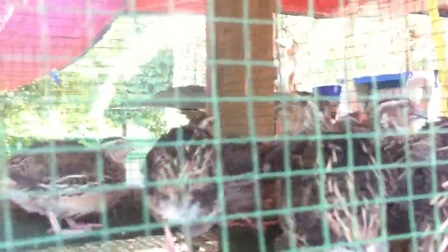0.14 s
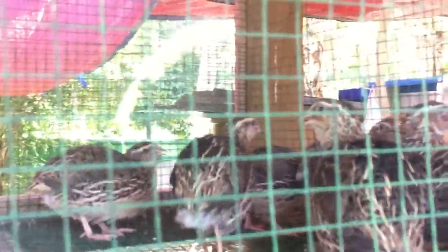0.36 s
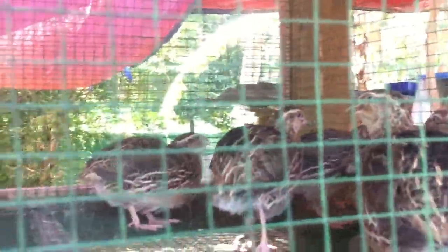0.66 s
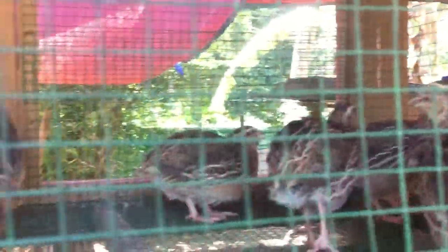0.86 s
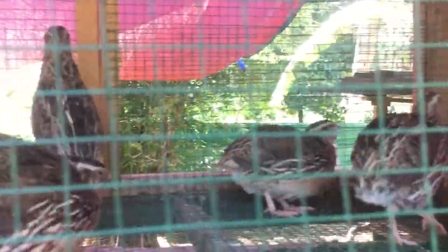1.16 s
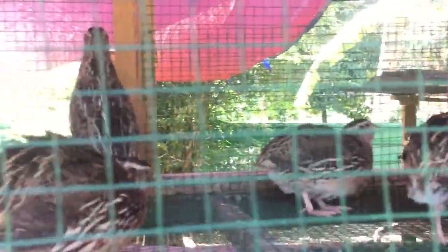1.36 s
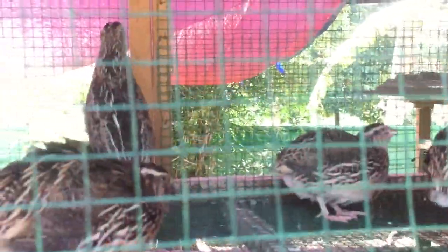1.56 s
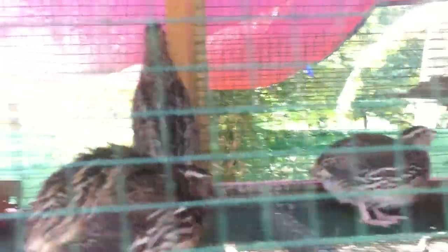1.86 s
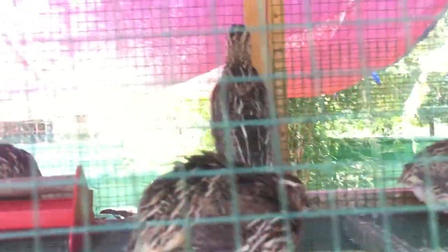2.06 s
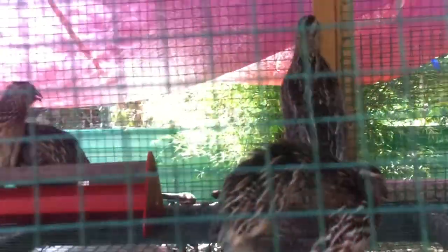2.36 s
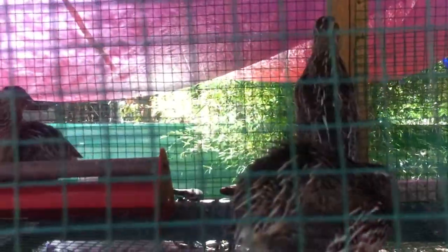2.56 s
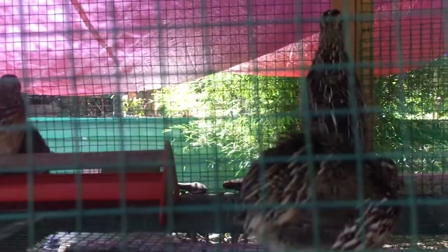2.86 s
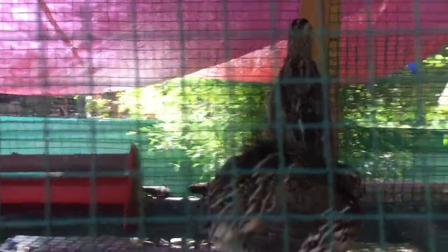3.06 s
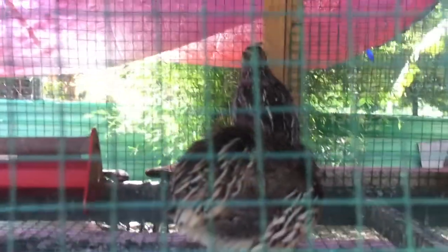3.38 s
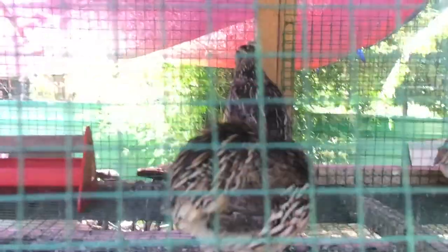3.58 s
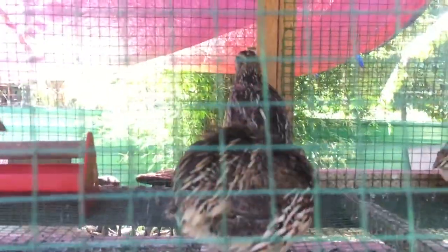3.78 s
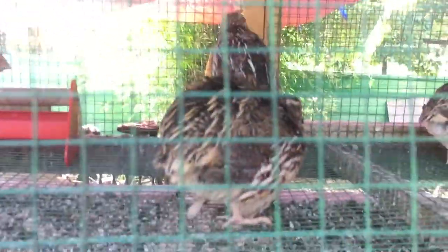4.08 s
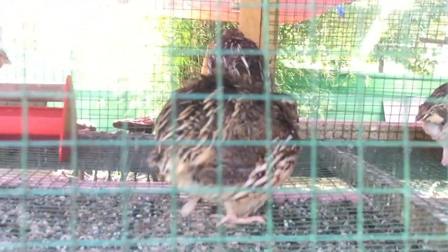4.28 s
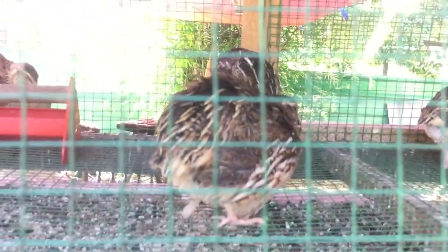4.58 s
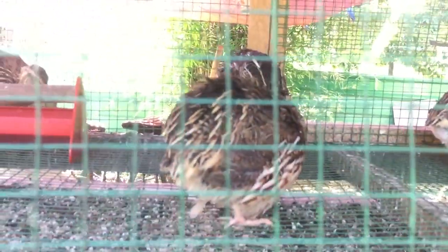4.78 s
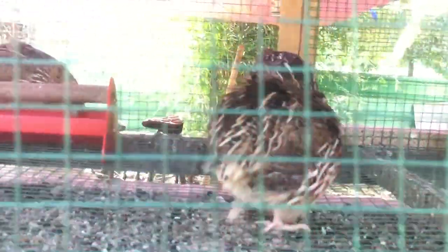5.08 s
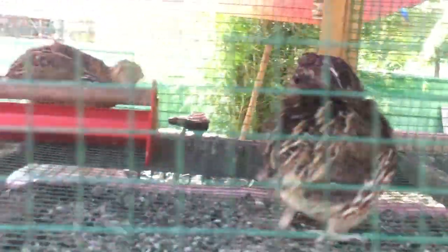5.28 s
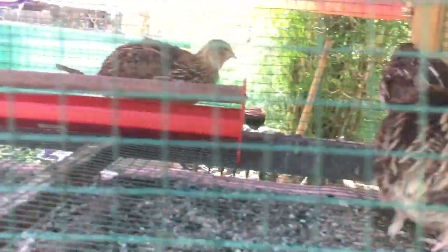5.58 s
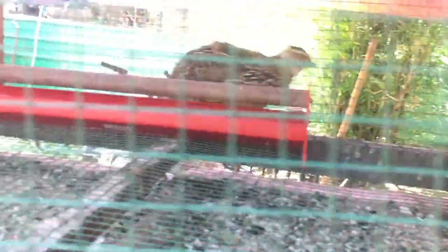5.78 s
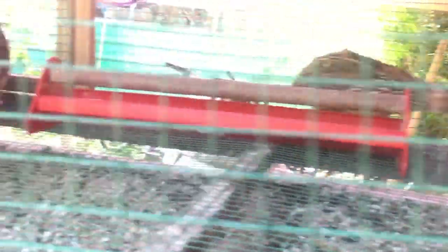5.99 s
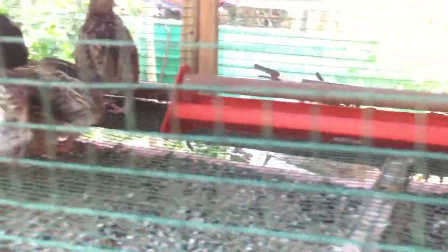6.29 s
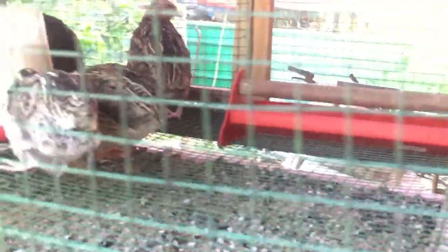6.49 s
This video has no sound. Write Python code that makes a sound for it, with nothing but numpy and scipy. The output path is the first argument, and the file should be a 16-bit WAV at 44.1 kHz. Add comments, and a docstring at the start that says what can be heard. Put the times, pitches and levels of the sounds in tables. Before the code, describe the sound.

Very loud, close quail crowing: rough whistles swooping rapidly up and down inside a pulsed rasp. One trill opens, two barks lead to a second, longer one, and a third, loudest, breaks into a screech before three seconds. Short pen echoes follow. The rest is soft flock peeps, dull knocks, scratchy ticks and two wavering spells of far fowl calling, over quiet outdoor air and hum.

```python
"""Quail crow in an outdoor wire pen: a harsh trill, two short barks and a longer trill, then a crow
very close to the microphone that ends in a screech. Each crow is a rough whistle that swoops inside a
pulsed noise rasp. Among them the flock chirps (gliding tones), pecks and shuffles (decaying noise bursts).
Far off, fowl give long sagging calls built from partials; yard air and a low wavering hum lie underneath.
The pen adds echoes, and an automatic gain turns down after loud calls."""
import sys
import numpy as np
from scipy import signal
from scipy.fft import rfft, irfft, next_fast_len
from scipy.io import wavfile

SR = 44100
rng = np.random.default_rng(int(sys.argv[2]) if len(sys.argv) > 2 else 0)


def inscribe(sig):
    """Save sig as 16-bit PCM at rate SR to the path in sys.argv[1].

    A 1-D sig is mono; a 2-D sig holds one channel per row.
    Samples are clipped to [-1, 1] before scaling.
    """
    pcm = np.round(np.clip(np.atleast_2d(sig).T, -1, 1) * 32767)
    wavfile.write(sys.argv[1], SR, pcm.astype(np.int16))


N = 292824
TIME = np.arange(N) / SR

# Three crows: (start [s], end [s], attack [s], release [dB/s], fall into a trough [s],
# closing pitch [Hz], change of level by the end [dB], roughness in the troughs [0-1])
CROWS = [(.080, 0.419, 0.039, 650, .030, 2247, -2.5, 0.38),
         (1.795, 2.208, 0.035, 1601, 0.025, 2354, -3.5, 0.44),
         (2.353, 2.653, 0.021, 1099, .017, 2905, -8, .2)]
# The run of swoops in each crow, about eighteen a second; one list per crow:
# (trough time [s], trough pitch [Hz], crest pitch [Hz], trough level [dB], crest level [dB])
SWOOPS = [
    [(.107, 1600, 3100, -14.5, -20), (.157, 1420, 3800, -16, -24.5), (.211, 1550, 3806, -15, -29),
     (.268, 1600, 3890, -15, -26), (.335, 1700, 3500, -14, -18)],
    [(1.823, 1520, 3000, -14, -15.5), (1.876, 1450, 3800, -16, -25), (1.928, 1550, 3900, -16.5, -20.5),
     (1.986, 1600, 3900, -16.5, -21), (2.042, 1450, 2996, -11, -13), (2.110, 1750, 3157, -16, -13.5),
     (2.188, 1550, 2424, -13.5, -12)],
    [(2.374, 1560, 3386, -11.5, -21), (2.417, 1700, 3800, -7, -12), (2.464, 1800, 3202, -10, -10),
     (2.514, 2400, 3100, -7.5, -7)],
]
# From its trough the pitch climbs slowly, leaps to the crest, sags there and falls into the next trough
CLIMB_S, CLIMB_RATIO, CREST_S, CREST_SAG_HZ_PER_S = 0.0125, 1.25, 0.020, 10000
# Over this range of pitch the whistle breaks into rasp
BREAK_HZ, BREAK_WIDTH_HZ, CREST_ROUGH = 1990, 1000, 0.9
# The voice is lifted as it passes through the resonance of the throat
THROAT_HZ, THROAT_WIDTH_HZ, THROAT_DB = 2160, 200, 4
# Short rising barks before the second crow:
# (start [s], length [s], start pitch [Hz], end pitch [Hz], level [dB], roughness [0-1])
BARKS = [(1.41, .047, 1169, 1333, -25, .72), (1.619, .036, 1256, 1670, -17.5, 0.5)]
BARK_ATTACK_S, BARK_RELEASE_DB_PER_S = 0.026, 647
# Colour of the rasp in troughs, crests, barks and final screech: (frequency [Hz], relative density [dB/Hz])
TROUGH_RASP = [(200, -45.5), (450, -26.5), (700, -14.5), (900, -5.5), (1500, 10), (2300, -1), (3200, -7.5),
               (4300, -20), (5200, -25.5), (7000, -17), (7800, -32), (10000, -34), (13500, -35.5),
               (15800, -47)]
CREST_RASP = [(200, -44.5), (450, -21), (700, -14.5), (900, -4), (1600, 0.5), (2600, 8), (3400, -5.5),
              (4400, -2.5), (5100, -24), (7000, -27), (8000, -33.5), (10000, -30.5), (13500, -33),
              (15800, -44)]
BARK_RASP = [(200, -30.5), (450, -28), (750, -4), (1200, 5), (2000, 7.5), (2800, -4), (4000, -24.5),
             (6300, -14), (8000, -42), (15000, -36)]
SCREECH_RASP = [(200, -46), (480, -35), (650, -16), (1080, -13), (1450, 3.5), (1750, -7), (2200, 1),
                (3200, 5.5), (3550, -9), (4600, -3), (4950, -16), (5400, -8.5), (6100, -25), (8000, -49)]
# Fine hiss of air through the beak: (frequency [Hz], relative density [dB/Hz])
BEAK_HISS = [(3530, -34), (6000, -4.5), (7070, 1), (8060, -14), (8390, -10), (8980, -1.5), (10300, -13.5),
             (10800, -4.5), (11400, -1.5), (12600, -7.5), (13200, -1.5), (13700, 0.5), (14200, -4),
             (15600, -23.5)]
# Instants when the voice locks into a whistle:
# (centre time [s], length [s], pitch [Hz], glide [octaves], peak level [dB])
FLARES = [(0.208, 0.0093, 1550, 0.05, -7), (0.3458, 0.0096, 1976, 0.0095, -0.5),
          (1.938, 0.0037, 2060, 0.18, -4), (1.969, 0.0052, 2290, -0.16, -6.5),
          (2.0916, 0.0047, 2700, -0.079, -1.5), (2.1163, 0.0099, 1960, 0.053, -2),
          (2.1957, .016, 1540, 0, -1), (2.381, 0.013, 1535, 0.23, -1.5), (2.4117, 0.0043, 2420, -0.38, 2.5),
          (2.426, 0.011, 1921, 0.25, 7), (2.47, 0.011, 2021, 0.34, 11.5)]

# Chirps and peeps of the flock:
# (start [s], length [s], start pitch [Hz], end pitch [Hz], level [dB], roughness [0-1])
CHIRPS = [(0.773, 0.042, 2820, 2190, -55, 0.18), (.78, 0.042, 3700, 3360, -58.5, 0.5),
          (0.837, 0.08, 3630, 3190, -56, .5), (3.184, 0.032, 737, 720, -43, 0.05),
          (3.275, 0.13, 397, 510, -53.5, 0.23), (3.88, 0.29, 1445, 1485, -50, 0.11),
          (4.686, 0.15, 3930, 4720, -59, 0.22), (4.974, 0.021, 2280, 2020, -48.5, 0.36),
          (5.543, 0.027, 943, 943, -51, 0.14), (5.604, 0.038, 1175, 1366, -49, 1),
          (5.68, 0.017, 2770, 2470, -50, 1), (5.795, .21, 1490, 1440, -52, 0.19),
          (5.885, 0.017, 1143, 1255, -47, 0.36)]
# Pecks on the wire: (time [s], relative level [dB], bright tick over dull knock [dB], 60 dB decay [s])
PECKS = [(.624, -36.5, -2, 0.076), (1.019, -48.5, 17, 0.084), (1.389, -34, -6, 0.046),
         (1.576, -40, -11, 0.053), (3.089, -47.5, -1, 0.095), (3.235, -48, 8, 0.088),
         (3.264, -43.5, -2, 0.076), (3.473, -43.5, -15, 0.097), (4.507, -46, -6, 0.14),
         (4.543, -30, -17, 0.023), (4.916, -36, -21, 0.024), (6.047, -44.5, 0, 0.07),
         (6.205, -30.5, -6.5, 0.041), (6.298, -43.5, 7, 0.12), (6.329, -39.5, -20, 0.092),
         (6.568, -47, 7, 0.097)]
# Colour of the dull knock and of the bright tick: (frequency [Hz], relative density [dB/Hz])
KNOCK = [(250, -17), (600, -5), (1150, 4), (1700, -9.5), (2300, -5), (3200, -10.5), (5000, -17)]
TICK = [(1500, -15.5), (3200, 7.5), (4500, -0.5), (6500, -7.5), (8000, -11), (10000, -11), (13500, -11),
        (16000, -14.5)]

# Distant fowl, one list per bird: (start [s], length [s], pitch [Hz], hold [s], sag after the hold [Hz/s],
# level [dB], final roughness [before limiting], other partials at the start [dB], at the end [dB])
FAR_CALLS = [
    [(2.60, 0.69, 733, 0.37, 178.7, -43.5, 0.64, -15.5, 4), (3.22, .40, 719, 0.35, 99.7, -51, 1.8, 3, 9)],
    [(4.25, 1.154, 667.6, .43, 129.9, -44.5, 0.49, 5.5, -3.5)],
]
# Resonances of their throats, one list per bird: (frequency [Hz], gain [dB])
FAR_THROATS = [
    [(540, -18.5), (730, 1), (910, -5), (1100, -11), (1280, -14), (1460, -7), (1650, -8), (1800, -3.5),
     (2000, -23), (2400, -9), (2600, -16.5), (2900, -19), (3200, -22), (4000, -45)],
    [(400, -5), (500, -4.5), (640, 5), (830, -14), (1000, -7), (1180, -6), (1370, 9.5), (1520, -20),
     (1680, 2), (1830, 1.5), (2020, -11.5), (2300, -16), (3000, -46)],
]
FAR_ATTACK_S, FAR_RELEASE_DB_PER_S, FAR_FADE_DB_PER_S = 0.093, 97, 9.5

# Colour of the air in the yard: (frequency [Hz], relative density [dB/Hz])
YARD_AIR = [(25, -14.5), (41, -8), (60, 1.5), (120, -1.5), (165, -8.5), (210, -10.5), (300, -15.5),
            (420, -13.5), (950, -18.5), (1800, -20.5), (3300, -31), (4400, -34), (8500, -44.5), (9150, -39),
            (9800, -45), (15600, -51)]
# The low hum: (frequency [Hz], relative level [dB])
HUM = [(60, -54.5), (68, -59.5), (89, -59.5), (114, -54)]
# Colour of the long ring of pen and yard: (frequency [Hz], relative density [dB/Hz])
LINGER = [(300, -12.5), (900, -4.5), (1600, -4), (2300, -2.5), (3100, -5.5), (4200, -12), (7000, -18),
          (15000, -33.5)]

# Gain control of the recorder: part of what exceeds the threshold is taken off, and gain recovers slowly
AGC_THRESHOLD_DB, AGC_SHARE, AGC_ATTACK_S, AGC_RELEASE_DB_PER_S = -14.5, 0.39, 0.053, 7.5
CUTOFF_HZ = 15700


def quail():
    """A harsh trill; two barks and a longer trill; then a very close trill that ends in a screech."""
    first, second, close = [trill(swoops, *row) for swoops, row in zip(SWOOPS, CROWS)]
    voices = crow(first, TROUGH_RASP, CREST_RASP, whistle_db=-2, low_db=-6.5, high_db=-3.5,
                  hiss_db=-46, width_hz=316, rattle_hz=250, rattle=0.29)
    voices += crow(second, TROUGH_RASP, CREST_RASP, whistle_db=-2.5, low_db=-2, high_db=-4.5,
                   hiss_db=-39, width_hz=280, rattle_hz=248, rattle=1.0)
    for row in BARKS:
        voices += crow(bark(*row), BARK_RASP, BARK_RASP, whistle_db=4, low_db=-6, high_db=-5,
                       hiss_db=-24, width_hz=220, rattle_hz=167.6, rattle=0.59)
    voices += crow(close, TROUGH_RASP, SCREECH_RASP, whistle_db=0.5, low_db=-7, high_db=-3,
                   hiss_db=-23, width_hz=410, rattle_hz=238.3, rattle=0.11)
    return flared(high_pass(voices, 520))


def trill(swoops, start, stop, attack_s, release_db_per_s, fall_s, end_hz, tire_db, trough_rough):
    """Samples, pitch, level and roughness of a crow; after its last crest the bird tires and settles."""
    at, age, envelope_db = envelope(start, stop - start, attack_s, release_db_per_s)
    now = TIME[at]
    trough_s, trough_hz, crest_hz, trough_db, crest_db = np.transpose(swoops)
    crest_s = trough_s + CREST_S
    last_crest = crest_s[-1]
    end = max(stop, last_crest + 1 / SR)

    # turning points of the pitch, joined by straight lines in log frequency
    turns = []
    for k, (t, low, high) in enumerate(zip(trough_s, trough_hz, crest_hz)):
        turns += [(t, low), (t + CLIMB_S, low * CLIMB_RATIO), (t + CREST_S, high)]
        if k + 1 < len(trough_s):
            stay = max(trough_s[k + 1] - fall_s - t - CREST_S, 0)
            turns.append((t + CREST_S + stay, high - CREST_SAG_HZ_PER_S * stay))
    turn_s, turn_hz = np.transpose(turns + [(end, end_hz)])
    hz = np.exp(np.interp(now, turn_s, np.log(turn_hz)))

    # level follows the height of the pitch between break and crest
    height = np.clip((hz - BREAK_HZ) / (np.interp(now, crest_s, crest_hz) - BREAK_HZ), 0, 1)
    db = (1 - height) * np.interp(now, trough_s, trough_db) + height * np.interp(now, crest_s, crest_db)
    db = db + THROAT_DB / (1 + ((hz - THROAT_HZ) / THROAT_WIDTH_HZ) ** 2)
    db = db + envelope_db + np.interp(now, [last_crest, end], [0, tire_db])

    broken = np.clip((hz - BREAK_HZ) / BREAK_WIDTH_HZ, 0, 1)
    rough = trough_rough + (CREST_ROUGH - trough_rough) * broken
    return at, hz, db, rough


def bark(start, length, start_hz, end_hz, db, rough):
    """Samples, pitch, level and roughness of one short rising bark."""
    at, age, envelope_db = envelope(start, length, BARK_ATTACK_S, BARK_RELEASE_DB_PER_S)
    hz = np.interp(age, [0, length], [start_hz, end_hz])
    return at, hz, db + envelope_db, np.full(len(at), rough)


def crow(track, low_colour, high_colour, whistle_db, low_db, high_db, hiss_db, width_hz, rattle_hz, rattle):
    """The syrinx whistles in the troughs and breaks into a bright rattling rasp on the crests."""
    at, hz, db, rough = track
    rough = np.clip(rough, 0.02, 1)

    # the membranes slap unevenly and chop the air into pulses
    slap_hz = rattle_hz * (1 + 0.25 * flutter(110, len(at)).real)
    slaps = np.cos(2 * np.pi * np.cumsum(slap_hz) / SR)
    pulses = rms_one(np.exp(rattle * slaps))

    # as the voice roughens, the whistle frays into a wide band
    fray = rough ** 2
    whistle = np.sqrt(1 - fray) * rough_tone(hz, rough, width_hz)
    whistle = whistle + 0.5 * np.sqrt(fray) * reflected(rough_tone(hz, 0.97, 510))

    # three separate streams of pulsed air: low rasp, high rasp and hiss
    air = [reflected(pulses * rng.standard_normal(len(at))) for _ in range(3)]
    crest = np.clip((hz - 1950) / 1000, 0, 1)
    low_rasp = from_db(low_db) * np.sqrt(1 - crest) * coloured(air[0], low_colour)
    high_rasp = from_db(high_db) * np.sqrt(crest) * coloured(air[1], high_colour)
    hiss = from_db(hiss_db) * (0.17 + crest) * coloured(air[2], BEAK_HISS)

    voiced = from_db(whistle_db) * whistle * pulses ** rough
    breath = np.sqrt(rough) * (low_rasp + high_rasp + hiss)
    out = np.zeros(N)
    out[at] = from_db(db) * (voiced + breath)
    return out


def flared(voice):
    """For an instant the rough voice locks into a pure gliding whistle."""
    out = voice.copy()
    for s, length, hz, glide, db in FLARES:
        u = np.linspace(-0.5, 0.5, int(length * SR))
        at = int((s - length / 2) * SR) + np.arange(len(u))
        lock = np.cos(np.pi * u)
        whistle = np.sin(2 * np.pi * np.cumsum(hz * 2 ** (glide * u)) / SR)
        out[at] = out[at] * (1 - lock) + from_db(db) * lock * whistle
    return out


def chirps(notes, width_hz):
    """Soft notes that glide quickly at first and then level off."""
    out = np.zeros(N)
    for s, length, start_hz, end_hz, db, rough in notes:
        u = np.linspace(0, 1, int(length * SR))
        hz = end_hz + (start_hz - end_hz) * (1 - u) ** 2
        note = rough_tone(hz, rough, width_hz) * np.sqrt(np.abs(np.sin(np.pi * u)))
        first = int(s * SR)
        out[first:first + len(u)] += from_db(db) * note
    return out


def chatter(count, level_db, spread_db, low_hz, high_hz, length_s, glide_octaves, rough):
    """Faint short peeps of the flock at random times and pitches, as rows like those of CHIRPS."""
    rows = []
    for when, pitch, size, bend in rng.random((count, 4)):
        hz = low_hz * (high_hz / low_hz) ** pitch
        end_hz = hz * 2 ** (glide_octaves * (2 * bend - 1))
        length = length_s * (0.5 + size)
        start = when * (TIME[-1] - length)
        rows.append((start, length, hz, end_hz, level_db + spread_db * size, rough))
    return rows


def pecks(level_db, rise_s):
    """Each peck is a dull knock of the frame and a bright scratch of the mesh."""
    out = np.zeros(N)
    for s, db, bright_db, t60 in PECKS:
        start = int(s * SR)
        age = TIME[:min(SR // 5, N - start)]
        sound = reflected(noise(KNOCK, len(age)) + from_db(bright_db) * noise(TICK, len(age)))
        decay = from_db(db + level_db - 60 * age / t60)
        out[start:start + len(age)] += decay * (1 - np.exp(-age / rise_s)) * sound
    return out


def shuffling(colour, per_s, level_db, t60):
    """Faint scratches and bumps of feet on the floor: random steps drive decaying noise."""
    strength = from_db(2.4 * np.minimum(rng.exponential(1, N), 3))
    steps = (rng.random(N) < per_s / SR) * strength
    decay = from_db(-60 / (t60 * SR))
    # the tiny offset keeps the filter off slow denormal numbers
    strokes = signal.lfilter([1], [1, -decay], steps + 1e-18)
    return from_db(level_db) * strokes * noise(colour, N)


def far_fowl(held_split_db, smear_hz, waver, flicker_db):
    """Long sagging calls whose voice splits into quarters of the pitch and frays at the end."""
    out = np.zeros(N)
    for calls, throat in zip(FAR_CALLS, FAR_THROATS):
        throat_hz, throat_db = np.transpose(throat)
        for start, length, top_hz, hold, sag, db, end_rough, first_split_db, last_split_db in calls:
            at, age, envelope_db = envelope(start, length, FAR_ATTACK_S, FAR_RELEASE_DB_PER_S)
            hz = top_hz - sag * np.maximum(age - hold, 0)
            hz = hz * (1 + waver * flutter(11.3, len(at)).real)
            rough = end_rough * age / length
            split_db = np.interp(age, [0, hold, length], [first_split_db, held_split_db, last_split_db])
            voice, power = 0, 0
            for k in np.arange(3, 19) / 4:  # partials at quarter steps of the pitch, from 0.75 to 4.5 times it
                gain = from_db(np.interp(k * hz, throat_hz, throat_db) + split_db * (k != 1))
                # over the distance each partial fades in and out on its own
                fading = from_db(flicker_db * np.sqrt(k) * flutter(6.5, len(at)).real)
                partial = rough_tone(k * hz, rough ** 2 * k, smear_hz)
                voice = voice + gain * rms_one(fading) * partial
                power = power + gain ** 2
            level_db = db + envelope_db - FAR_FADE_DB_PER_S * np.abs(age - hold)
            out[at] += from_db(level_db) * voice / np.sqrt(power)
    return out


def yard(air_db, hum_db, hum_width_hz):
    """Outdoor air as coloured noise, and a low hum of wavering tones."""
    air = from_db(air_db) * high_pass(noise(YARD_AIR, N), 42)
    hum = sum(from_db(db + hum_db) * rough_tone(np.full(N, hz), 0.92, hum_width_hz) for hz, db in HUM)
    return air + hum


def echoes(x, t60, wet_db, dull_hz):
    """Dense dull reflections that die away."""
    age = TIME[:SR]
    tail = rng.standard_normal(SR) * from_db(-60 * age / t60) * (age > 0.003)
    tail = tail / np.sqrt(np.sum(tail ** 2))
    tail = signal.sosfilt(signal.butter(2, dull_hz, fs=SR, output="sos"), tail)
    return from_db(wet_db) * signal.fftconvolve(x, tail)[:N]


def lingering(x, t60, wet_db):
    """A faint long ring of the pen and the yard around it."""
    age = TIME[:SR]
    tail = noise(LINGER, SR) * from_db(-60 * age / t60) * np.minimum(age / 0.02, 1)
    tail = tail / np.sqrt(np.sum(tail ** 2))
    return from_db(wet_db) * signal.fftconvolve(x, tail)[:N]


def reflected(x, spread_s=0.009, gain=0.62):
    """Near surfaces at random distances comb a broad sound into gritty bands; rms 1."""
    at = np.arange(len(x))
    bounces = 0
    for delay in spread_s * rng.uniform(0.15, 1, 4):
        bounces = bounces + rng.choice([-1, 1]) * np.interp(at - delay * SR, at, x, left=0)
    return rms_one(x + gain * bounces)


def envelope(start, length, attack_s, release_db_per_s):
    """A call swells, holds and dies away: its samples, their age in s and its level in dB."""
    silent_db = 60  # the release is followed down this far
    stop = start + length + silent_db / release_db_per_s
    at = np.arange(int(start * SR), min(int(stop * SR), N))
    age = (at - at[0] + 1) / SR
    swell = np.minimum(age / attack_s, 1) ** 2
    return at, age, 20 * np.log10(swell) - release_db_per_s * np.maximum(age - length, 0)


def rough_tone(hz, rough, width_hz):
    """A tone on a pitch track, part steady and part chaotic; rms about 1."""
    rough = np.clip(rough, 0, 1)
    body = np.sqrt(1 - rough) + np.sqrt(rough) * flutter(width_hz, len(hz))
    return np.sqrt(2) * np.real(body * np.exp(2j * np.pi * np.cumsum(hz) / SR))


def flutter(width_hz, size):
    """Random wander of strength and phase, which smears a tone into a band."""
    run_in = 4000  # samples for the filter to settle
    white = rng.standard_normal((size + run_in, 2)) @ [1, 1j]
    slow = signal.sosfilt(signal.butter(2, width_hz, fs=SR, output="sos"), white)
    return rms_one(slow[run_in:])


def noise(spectrum, size):
    """Noise of a given colour, rms 1."""
    return coloured(rng.standard_normal(size), spectrum)


def coloured(x, spectrum):
    """Filter a sound by a spectrum that closes at the bottom; rms 1."""
    hz, db = np.transpose(spectrum)
    size = next_fast_len(len(x), True)
    bins = np.fft.rfftfreq(size, 1 / SR)
    gain = from_db(np.interp(np.log(bins + 1), np.log(hz), db))
    gain = gain * np.minimum(bins / hz[0], 1) ** 2
    return rms_one(irfft(gain * rfft(x, size), size)[:len(x)])


def high_pass(x, edge_hz):
    """Attenuate what lies under an edge."""
    return signal.sosfilt(signal.butter(4, edge_hz, "high", fs=SR, output="sos"), x)


def rms_one(x):
    """Scale to unit power."""
    return x / np.sqrt(np.mean(np.abs(x) ** 2) + 1e-20)


def from_db(db):
    """Decibels to gain."""
    return 10 ** (np.asarray(db) / 20)


def scene():
    """The birds in their pen, the far fowl and the yard."""
    scratches = shuffling(TICK, per_s=12, level_db=-71.5, t60=0.063)
    bumps = shuffling(KNOCK, per_s=11, level_db=-56, t60=0.06)
    peeps = chatter(count=70, level_db=-64, spread_db=8, low_hz=452, high_hz=2370,
                    length_s=0.015, glide_octaves=0.13, rough=0.3)
    # chirps, pecks and feet ring in the pen along with the crows
    pen = quail() + chirps(CHIRPS + peeps, width_hz=330) + pecks(level_db=-0.5, rise_s=0.002)
    pen = pen + scratches + bumps
    space = echoes(pen, t60=0.13, wet_db=-9.5, dull_hz=6005) + lingering(pen, t60=0.57, wet_db=-34)
    far = far_fowl(held_split_db=-1, smear_hz=59.4, waver=0.00611, flicker_db=4)
    background = yard(air_db=-51, hum_db=-5, hum_width_hz=7.5)
    return (pen + space + far + background)[None]


def gain_control(x):
    """Turn down after a loud call and creep back up."""
    keep = np.exp(-1 / (AGC_ATTACK_S * SR))
    power = signal.lfilter([1 - keep], [1, -keep], x[0] ** 2)
    level_db = 10 * np.log10(power + 1e-12)
    cut_db = AGC_SHARE * np.maximum(level_db - AGC_THRESHOLD_DB, 0)
    # the deepest cut so far holds, less a steady recovery
    recovery = AGC_RELEASE_DB_PER_S * TIME
    return x * from_db(recovery - np.maximum.accumulate(cut_db + recovery))


def record(dry):
    """The gain ducks under the crows, the loudest swells still overload; the top is cut."""
    knee = 4  # higher is a harder bend into overload
    level = gain_control(dry)
    clipped = level / (1 + np.abs(level / 1.013) ** knee) ** (1 / knee)
    return signal.sosfilt(signal.ellip(10, 0.1, 80, CUTOFF_HZ, fs=SR, output="sos"), clipped)


dry = scene()
out = record(dry)
inscribe(out)
```